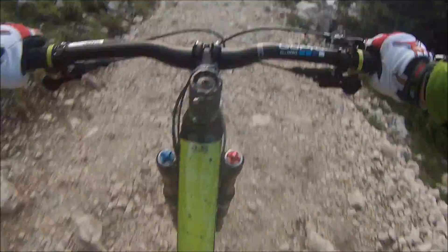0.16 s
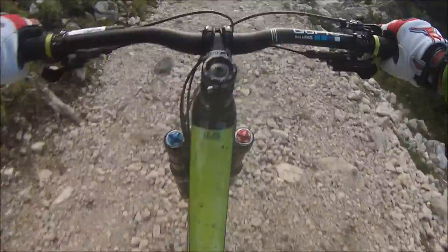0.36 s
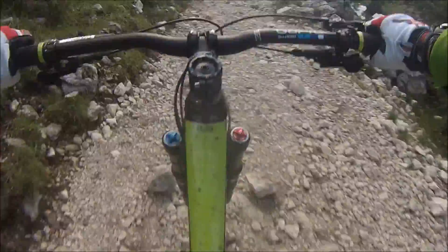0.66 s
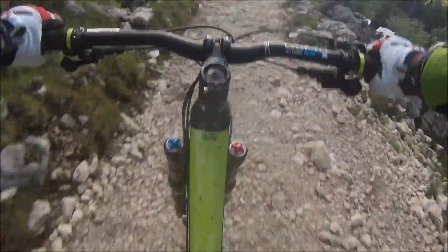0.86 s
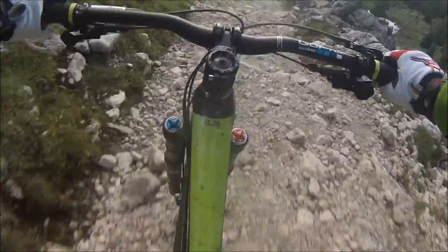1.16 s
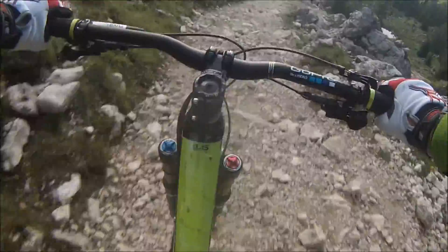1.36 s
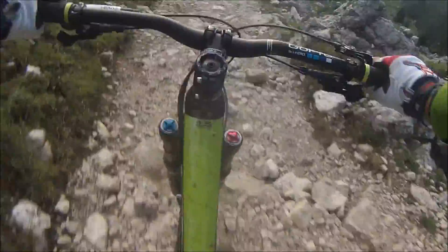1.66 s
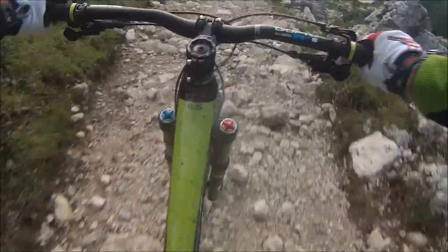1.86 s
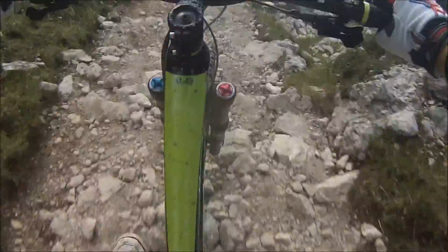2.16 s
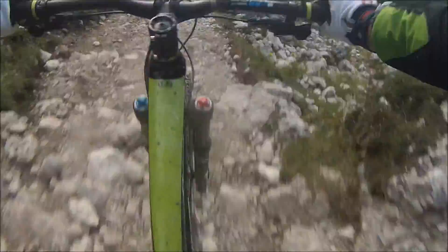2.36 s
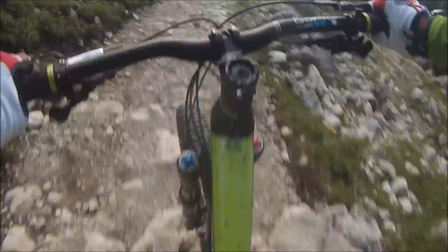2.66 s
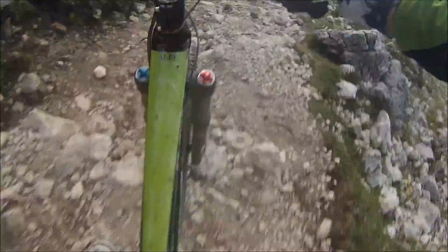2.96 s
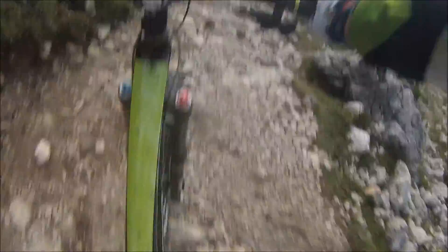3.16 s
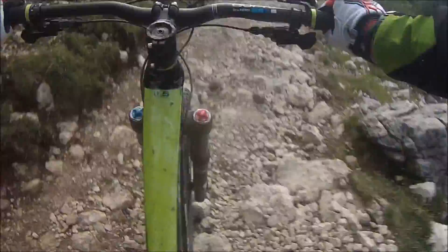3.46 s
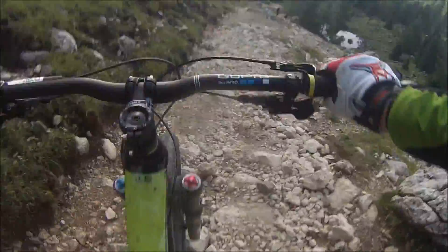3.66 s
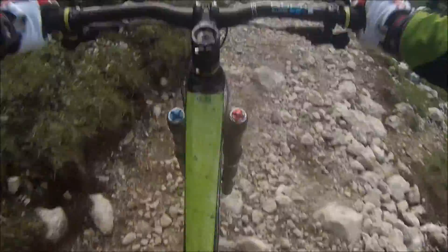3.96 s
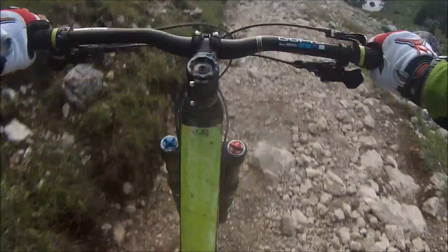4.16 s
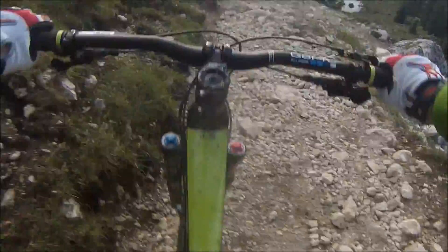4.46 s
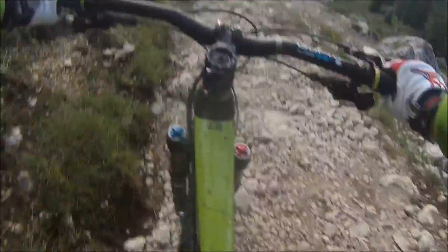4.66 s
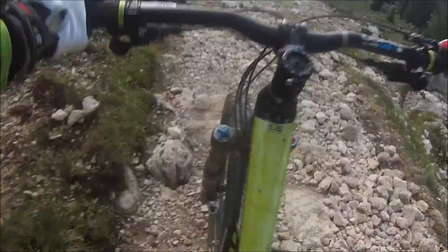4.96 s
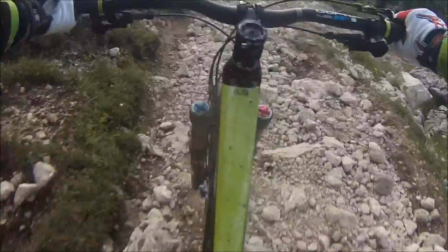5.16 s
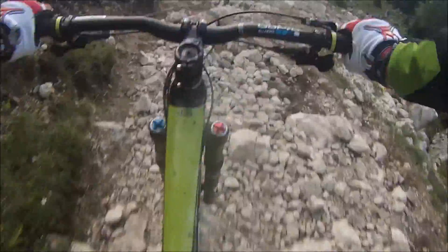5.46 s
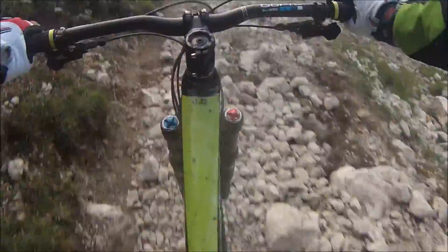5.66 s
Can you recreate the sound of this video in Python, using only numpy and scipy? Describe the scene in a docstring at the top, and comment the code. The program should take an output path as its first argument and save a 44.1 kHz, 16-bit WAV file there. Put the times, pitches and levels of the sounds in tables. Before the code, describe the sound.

A mountain bike rattles and knocks down a loose stony trail, tyres crunching gravel, brakes whistling very high, low wind rumbling on the microphone.

```python
"""On a trail of loose stones a mountain bike rolls downhill, heard from the rider's chest.
Filtered noise makes wind and jolts on the microphone; random stone contacts make the crunch of the tyres.
Short pushes through banks of resonances make the knocking frame and the clacking chain and loose parts,
and faint decaying tones ring on after them. Chirped, fluttering sines make the very high whistle of the
feathered disc brake; short low sine bursts are the tyres thumping into hollows."""
import sys
import numpy as np
from scipy import signal
from scipy.fft import rfft, irfft, next_fast_len
from scipy.io import wavfile
from scipy.ndimage import map_coordinates

SR = 44100
rng = np.random.default_rng(int(sys.argv[2]) if len(sys.argv) > 2 else 0)


def master(y):
    """Save y as 16-bit WAV."""
    cut = np.clip(np.atleast_2d(y).T, -1, 1)
    pcm = np.round(cut * 32767)  # scale
    wavfile.write(sys.argv[1], SR, pcm.astype(np.int16))


N = 255780
TIME = np.arange(N) / SR  # s
BLOW_SIZE = 8192  # samples in one blow
BLOW_HZ = np.arange(BLOW_SIZE // 2 + 1) * SR / BLOW_SIZE

# roughness of the ride; only its swing about the mean is used: (t/s, level/dB)
RIDE_ROUGHNESS = [(0.0, -40), (0.79, -39), (0.93, -43), (1.58, -43), (1.86, -32.5), (2.34, -36),
                  (2.55, -31.5), (2.79, -30), (2.96, -35), (3.16, -34), (3.38, -25.5), (3.84, -38.5),
                  (4.1, -34), (4.51, -41), (4.64, -28.5), (4.85, -40), (5.32, -31.5), (5.8, -38)]
# spectrum of wind on the microphone: (f/Hz, relative level/dB per Hz)
WIND_SPECTRUM = [(15,-5),(28,8),(45,2),(70,-9),(110,-20),(200,-20.5),(400,-43.5)]
# spectrum of the shaking that comes up through the rider: (f/Hz, relative level/dB per Hz)
JOLT_SPECTRUM = [(40,-12),(75,-0.5),(105,6),(170,0),(260,-16.5),(450,-15),(800,-50),(1600,-69)]
WIND_DB, WIND_FOLLOWS = -31.5, 0.82  # wind at mean roughness; dB per dB of roughness
JOLT_DB, JOLT_FOLLOWS = -41, 0.85  # the same for the shaking

# gravel under the rolling tyres: (t/s, level/dB)
ROLLING_LEVEL = [(0.0, -50), (0.79, -49), (0.97, -49.5), (1.55, -50), (1.84, -49), (2.34, -48.5),
                 (2.52, -45), (2.62, -45), (2.92, -53.5), (3.05, -50.5), (3.28, -46.5), (3.93, -48.5),
                 (4.2, -49.5), (4.35, -53.5), (4.51, -43.5), (4.62, -45.5), (4.9, -51), (5.8, -50)]
# spectrum of crunching gravel: (f/Hz, relative level/dB per Hz)
GRAVEL_SPECTRUM = [(200,-8),(450,2.5),(780,0),(1150,2),(1700,4),(2400,6.5),(3200,-24),(4500,-19),(8000,-24.5)]
# spectrum of hissing grit: (f/Hz, relative level/dB per Hz)
GRIT_SPECTRUM = [(1500,-4),(3000,6.5),(4200,1),(6500,-12),(9000,-10.5),(11000,-13.5),(14000,-20),(16000,-30)]
# spectrum of single clicking pebbles: (f/Hz, relative level/dB per Hz)
PEBBLE_SPECTRUM = [(300,-16.5),(1500,6),(3000,-3.5),(7000,-40.5)]
# spectrum of tumbling stones: (f/Hz, relative level/dB per Hz)
STONE_SPECTRUM = [(110,-9),(170,14.5),(280,-1),(450,-2),(750,-38),(1100,-19),(1800,-37)]
# resonances of the rolling wheels: (f/Hz, width/Hz, level/dB)
WHEEL_MODES = [(1530,91,10),(2040,240,0.5),(3420,240,5.5),(4980,150,9.5),(5540,940,0),(6600,480,10)]

# knocks through the frame, a firm one often followed by a soft, hollow rebound:
# (t/s, force level/dB, hollow ring level/dB)
FRAME_KNOCKS = [(0.0277, 25, -10), (0.0632, 24.5, 17.5), (0.3229, 30, 6), (0.3717, 26, 16),
                (0.5235, 22, 11.5), (1.1067, 15, 8), (1.536, 23.5, 5), (1.704, 30.5, 6),
                (1.7556, 31.5, 18.5), (2.0653, 29.5, 5.5), (2.1025, 28, 17), (2.392, 12.5, -5),
                (2.465, 26, 19.5), (2.4779, 13.5, -6), (2.509, 15, -5), (2.6981, 26, 1.5), (2.8301, 17, 17),
                (3.2985, 16.5, 5), (3.7648, 32, 10.5), (4.0935, 13.5, -10.5), (4.1955, 29, -0.5),
                (4.2348, 25.5, 14.5), (4.451, 10, -11), (4.493, 8.5, -10), (4.5197, 27, -1),
                (4.6418, 13, 8.5), (4.6918, 26.5, -0.5), (4.7392, 27.5, 16), (4.8171, 22.5, 18.5),
                (5.003, 14.5, 8), (5.1965, 27.5, -4), (5.385, 24, -10), (5.6235, 27, -5)]
# resonances (+) and antiresonances (-) of the frame: (f/Hz, width/Hz, level/dB)
FRAME_MODES = [(86.7, 21.7, 13.5), (186.6, 19, 3.5), (796, 196, -38), (1180, 376, 17.5), (1348, 276, -8),
               (1773, 175, -37.5), (1877, 145, 7), (2354, 547, 16.5), (2744, 340, -43), (3715, 80, 12.5),
               (4900, 173, 34.5), (5100, 53, 8), (5240, 4260, -32.5), (6230, 120, 9)]
FIRM_SHARP_HZ, FIRM_BASS_DB = 308.4, 0.5  # contact sharpness and bass of a firm knock
# the hollower a knock rings, the duller and lighter it is (both per dB of hollow ring)
SOFTEN_OCTAVES_PER_DB, BASS_LOSS_PER_DB = 0.04, 0.34
# long rings of the metal after a blow, ahead of their overall level: (f/Hz, level/dB, t60/s)
METAL_RINGS = [(1620,-54,0.067),(3745,-49,0.13)]

# chain and loose parts striking: (t/s, force level/dB, contact sharpness f/Hz, ring f/Hz, ring level/dB)
PART_CLACKS = [(0.185, -5, 877, 2460, 32), (0.4363, 5.5, 1450, 2260, 15), (0.6484, 13.5, 1210, 2235, 18),
               (1.3309, 8, 1870, 2280, 9.5), (1.6496, 12.5, 2090, 2230, 5.5), (1.8031, -2, 1090, 1940, 15),
               (1.829, 7.5, 1270, 1530, 16.5), (1.9717, 9.5, 1760, 2080, 12.5), (2.015, 5, 790, 3000, 13),
               (2.194, -7, 700, 2380, 27), (2.293, 12, 484, 2240, 13), (2.3396, 3.5, 2100, 2410, 24),
               (2.426, 9, 714, 1930, 18), (2.447, 16.5, 600, 2410, 20.5), (2.535, 10.5, 690, 2190, 23),
               (2.5884, 0, 1010, 2020, 11), (2.659, -7.5, 2600, 3480, 13.5), (2.693, 6.5, 697, 2040, 16),
               (2.7553, 10.5, 2000, 1910, 3.5), (2.9411, 12, 1040, 2350, 17),
               (3.0236, -5, 2020, 2460, 29.5), (3.183, -8, 1500, 1510, 22), (3.2496, 4, 700, 1800, 22.5),
               (3.316, 4, 1130, 2430, 18), (3.4052, 5.5, 406, 2190, 27.5), (3.5754, -2, 1540, 3590, 19),
               (4.0391, 0, 1980, 2510, 28.5), (4.2666, 3, 600, 2200, 20), (4.3246, 5.5, 920, 2040, 19),
               (4.4264, 3.5, 1090, 2360, 18), (4.803, 9.5, 940, 2320, 10), (4.9693, 7, 2300, 2350, 14),
               (5.0536, 10.5, 2050, 2140, 7), (5.0992, 8.5, 790, 2150, 16.5),
               (5.1474, 2.5, 1060, 2060, 9.5), (5.3305, 1, 2150, 2490, 26.5),
               (5.4573, -2.5, 1260, 2450, 30.5), (5.667, 11, 527, 2360, 26)]
# resonances (+) and antiresonances (-) of the loose parts: (f/Hz, width/Hz, level/dB)
PART_MODES = [(844,300,-11),(1470,1500,3.5),(2081,93,9.5),(3053,114,8.5),(3770,100,9),(4110,53,6),(4916,128,15),(5730,500,-20),(6500,237,13),(7150,150,-13),(8800,130,4.5)]
CLACK_WIDTH_HZ = 243  # width of the main ring

# pulls on the brake lever; the turning disc chirps at an even pace:
# (start t/s, end t/s, number of chirps, level/dB, pitch f/Hz)
BRAKE_PULLS = [(0.209, 0.291, 2, -51.5, 12000), (0.779, 0.955, 2, -47.5, 12120),
               (0.983, 1.611, 6, -44.5, 12400), (1.724, 1.762, 1, -54, 11700), (1.807, 1.99, 1, -46, 12230),
               (1.975, 2.185, 4, -51, 11600), (2.378, 2.407, 1, -46, 11500),
               (2.448, 2.693, 2, -46.5, 12050), (2.801, 2.96, 1, -51, 12350), (2.937, 2.976, 1, -51, 12700),
               (3.098, 3.145, 1, -53, 12300), (3.162, 3.434, 3, -48.5, 12280),
               (3.629, 3.812, 3, -56, 11640), (4.417, 4.51, 1, -45.5, 12140), (4.69, 4.72, 1, -59, 13100),
               (4.81, 5.303, 8, -58, 11750), (5.322, 5.528, 2, -48.5, 12100), (5.542, 5.576, 1, -46, 12600),
               (5.663, 5.893, 2, -51, 12200)]
RUB_SHARE = 0.51  # part of each period in which the pad rubs
CHIRP_BEND_HZ = 170  # mean bend: a chirp usually starts high, sags by about this much and rises again

# a tyre slides and shoves stones aside:
# (start t/s, end t/s, gravel level/dB, coarseness as level of tumbling stones over gravel/dB)
TYRE_SLIDES = [(0.78, 0.823, -54, -22), (2.443, 2.499, -39, 10), (2.803, 2.831, -46, 21),
               (2.93, 2.934, -46, 25), (3.141, 3.339, -54, 20.5), (3.555, 3.634, -51.5, 18.5),
               (4.12, 4.154, -45.5, 9.5), (4.411, 4.589, -45.5, 3.5), (4.78, 4.838, -57, 21),
               (5.457, 5.514, -51, -2), (5.571, 5.595, -50, 7)]
# grit over gravel in a slide; the coarser the stones, the less grit (per dB of coarseness)
GRIT_DB, GRIT_LOSS_PER_DB = -7, 0.72

# tyres bottoming on rocks: (t/s, level/dB at the top of the swell)
TYRE_THUMPS = [(2.431, -12), (2.4453, -10.5), (2.8122, 1.5), (2.9347, -9), (3.227, -9), (3.4016, -3.5),
               (4.566, -9.5), (5.658, -14), (5.676, -8)]


def from_db(db):
    """Decibels to gain."""
    return 10 ** (np.asarray(db) / 20)


def rms_one(x):
    """Scale to unit power."""
    return x / np.sqrt(np.mean(x ** 2) + 1e-20)


def add(out, s, sound):
    """Mix a sound in at time s."""
    at = max(round(s * SR), 0)
    out[at:at + len(sound)] += sound[:max(N - at, 0)]


def drift(rate):
    """Smooth random wander through `rate` random points a second, rms 1."""
    knots = rng.standard_normal(8192)
    return rms_one(map_coordinates(knots, [TIME * rate], order=3, mode="wrap"))


def resonances(hz, table):
    """Causal response of a chain of peaks and dips."""
    s = 1j * hz
    response = 1
    for f, width, db in table:
        peak = s * s + s * width * from_db(db) + f * f
        response = response * peak / (s * s + s * width + f * f)
    return response


def coloured(x, spectrum, body=None):
    """Give x a smooth spectrum and, if there is one, the resonances of a body; rms 1."""
    size = next_fast_len(N)
    hz = np.arange(size // 2 + 1) * SR / size + 1e-3
    points_hz, points_db = np.transpose(spectrum)
    gain = from_db(np.interp(np.log(hz), np.log(points_hz), points_db))
    # roll off beyond both ends of the table
    gain = gain / (1 + (hz / points_hz[-1]) ** 2)
    gain = gain / (1 + (.5 * points_hz[0] / hz) ** 2)
    if body:
        gain = gain * resonances(hz, body)
    return rms_one(irfft(rfft(x, size) * gain, size)[:N])


def grains(per_s, spread_db, hiss):
    """Random stone contacts of very uneven size on a bed of fine hiss."""
    sizes = from_db(spread_db * np.minimum(rng.exponential(1, N), 4))
    signed = sizes * rng.choice([-1, 1], N)
    struck = rng.random(N) < per_s / SR
    return rms_one(signed * struck) + hiss * rng.standard_normal(N)


def rumble(rough_db):
    """Lumpy wind on the microphone and shaking through the rider; both grow with the roughness of the ride."""
    wind = coloured(rng.standard_normal(N) * from_db(4.4 * drift(24)), WIND_SPECTRUM)
    jolts = coloured(grains(per_s=150, spread_db=3.5, hiss=0.52), JOLT_SPECTRUM)
    wind_gain = from_db(WIND_DB + WIND_FOLLOWS * rough_db)
    jolt_gain = from_db(JOLT_DB + JOLT_FOLLOWS * rough_db)
    return wind_gain * wind + jolt_gain * jolts


def tyres(rolling_db):
    """Stones grind under the tread in clumps; slides add tumbling stones, clicking pebbles and hissing grit."""
    shoved, ground_up, sprayed = sliding()
    clumps = from_db(3.1 * drift(55))
    stones = coloured(grains(per_s=310, spread_db=3.0, hiss=0.25), STONE_SPECTRUM)
    gravel = coloured(clumps * grains(per_s=1200, spread_db=3.5, hiss=0.98), GRAVEL_SPECTRUM, WHEEL_MODES)
    pebbles = coloured(grains(per_s=170, spread_db=4.5, hiss=.1), PEBBLE_SPECTRUM, WHEEL_MODES)
    grit = coloured(clumps * grains(per_s=2400, spread_db=5.0, hiss=0.85), GRIT_SPECTRUM, WHEEL_MODES)
    crunch = from_db(-2.5) * gravel + from_db(-9.0) * pebbles + from_db(-9.5) * grit
    roll = from_db(rolling_db) * crunch
    tumble = shoved * (stones + from_db(-4.5) * pebbles)
    return roll + tumble + ground_up * gravel + from_db(-3.0) * sprayed * grit


def contact(sharp_hz):
    """Spectrum of a short push: the softer the contact, the less treble."""
    s = 1j * BLOW_HZ / sharp_hz
    return 1 / (s * s + np.sqrt(2) * s + 1)


def dispersion(centre_hz, width_hz):
    """Bending waves of different pitch arrive at different times, which spreads a blow."""
    s = 1j * BLOW_HZ
    return (s * s - s * width_hz + centre_hz ** 2) / (s * s + s * width_hz + centre_hz ** 2)


def chatter(level_db, fade_s, low_hz):
    """The surfaces never meet cleanly: a swarm of tiny rebounds, thinned below low_hz, follows each blow."""
    t, s = TIME[:BLOW_SIZE], 1j * BLOW_HZ
    rebounds = rng.standard_normal(BLOW_SIZE) * (t / fade_s) * np.exp(-t / fade_s)
    swarm = rfft(rebounds / np.sqrt(np.sum(rebounds ** 2)))
    return 1 + from_db(level_db) * swarm * s / (s + low_hz)


def shaken_part(level_db=5, lag_s=0.007, ring_hz=2110, width_hz=95):
    """A loose part lifts with a knock and lands a moment later, ringing."""
    s = 1j * BLOW_HZ
    lag = lag_s * np.exp(0.18 * rng.standard_normal())
    ring = s * width_hz / (s * s + s * width_hz + ring_hz ** 2)
    return from_db(level_db) * ring * np.exp(-2 * np.pi * s * lag)


def knocks(bass_hz=150, low_cut_hz=40, hollow_hz=475, hollow_width_hz=50):
    """Each rock drives the frame; the softer rebounds also ring a hollow note."""
    out, s = np.zeros(N), 1j * BLOW_HZ
    frame = resonances(BLOW_HZ, FRAME_MODES) * s / (s + low_cut_hz)
    frame = frame * dispersion(centre_hz=1520, width_hz=5900) * contact(sharp_hz=7950)
    frame = frame * resonances(BLOW_HZ, [(4520, 1440, -16.0)])  # broad dip in the treble
    for at, force_db, hollow_db in FRAME_KNOCKS:
        softness = max(hollow_db, 0)
        sharp_hz = FIRM_SHARP_HZ * 2 ** (-SOFTEN_OCTAVES_PER_DB * softness)
        bass_gain = from_db(FIRM_BASS_DB - BASS_LOSS_PER_DB * softness)
        bass = (s + bass_hz * bass_gain) / (s + bass_hz)
        note_hz = hollow_hz * (1 + 0.011 * rng.standard_normal())
        hollow = resonances(BLOW_HZ, [(note_hz, hollow_width_hz, hollow_db)])
        push = contact(sharp_hz) * chatter(level_db=-6.5, fade_s=0.0018, low_hz=880)
        response = frame * bass * hollow + shaken_part(level_db=15)
        add(out, at, from_db(force_db) * irfft(response * push))
    return out


def metal_ring(blows):
    """The metal goes on ringing faintly after every blow, unevenly as the bike shakes."""
    t = TIME[:BLOW_SIZE]
    ring = sum(from_db(db - 60 * t / t60) * np.sin(2 * np.pi * hz * t) for hz, db, t60 in METAL_RINGS)
    return from_db(-8.5 + 2.4 * drift(60)) * signal.fftconvolve(blows, ring)[:N]


def rattles(rough_db, count=40, force_db=-11, spread_db=3, sharp_hz=850, ring_hz=1950, ring_db=14):
    """Faint clacks at random moments, stronger where the ride is rough; rows like those of PART_CLACKS."""
    moments = (rng.random(count) * N).astype(int)
    rows = []
    for i, (size, spot) in zip(moments, rng.standard_normal((count, 2))):
        level_db = force_db + rough_db[i] + spread_db * size
        rows.append((i / SR, level_db, sharp_hz, ring_hz * np.exp(0.41 * spot), ring_db))
    return rows


def clacks(rough_db):
    """Hard little blows; each struck spot has its own main ring and weights the upper resonances anew."""
    out = np.zeros(N)
    spread = dispersion(centre_hz=2070, width_hz=430) * contact(sharp_hz=8240)
    for at, force_db, sharp_hz, ring_hz, ring_db in PART_CLACKS + rattles(rough_db):
        weights = 1 + 0.12 * rng.standard_normal(len(PART_MODES))
        modes = [(ring_hz, CLACK_WIDTH_HZ, ring_db)]
        for (hz, width, db), weight in zip(PART_MODES, weights):
            is_upper = hz > ring_hz + CLACK_WIDTH_HZ
            modes.append((hz, width, db * weight if is_upper else db))
        spot = resonances(BLOW_HZ, modes)
        push = contact(sharp_hz) * chatter(level_db=1.5, fade_s=0.00097, low_hz=4800)
        add(out, at, from_db(force_db) * irfft(spread * spot * push))
    return out


def brake(attack_s=0.0021, ring_s=0.01, wander_hz=100, glide_hz=90, rough_db=5.0):
    """The pads excite one high disc mode in even chirps; it bends and flutters with the grip, then rings out."""
    out = np.zeros(N)
    flutter = rms_one(from_db(rough_db * drift(350)))
    wander = wander_hz * drift(500) + glide_hz * drift(28)
    for first, end, count, level_db, pitch_hz in BRAKE_PULLS:
        starts, period_s = np.linspace(first, end, round(count), endpoint=False, retstep=True)
        rub_s = RUB_SHARE * period_s
        for start, grip in zip(starts, rng.standard_normal(len(starts))):
            span = slice(int(start * SR), int((start + rub_s + .08) * SR))
            t = np.maximum(TIME[span] - start, 0)
            bend = (2 * np.minimum(t / rub_s, 1) - 1) ** 2  # high, low, high over one rub
            hz = pitch_hz + wander[span] + CHIRP_BEND_HZ * (1 + 0.6 * grip) * bend
            swell = (1 - np.exp(-t / attack_s)) ** 2 * np.exp(-np.maximum(t - rub_s, 0) / ring_s)
            whistle = np.sin(2 * np.pi * np.cumsum(hz) / SR)
            add(out, start, from_db(level_db) * swell * flutter[span] * whistle)
    return out


def sliding(bite_s=0.0039, settle_s=0.012):
    """Strength of tumbling stones, gravel and grit: each slide bites quickly and then settles."""
    out = np.zeros((3, N))
    for start, end, gravel_db, coarse_db in TYRE_SLIDES:
        bite = np.clip((TIME - start) / bite_s, 0, 1)
        settle = np.exp(-np.clip(TIME - end, 0, 1) / settle_s)
        grit_db = gravel_db + GRIT_DB - GRIT_LOSS_PER_DB * coarse_db
        levels_db = [gravel_db + coarse_db, gravel_db, grit_db]
        out += from_db(levels_db)[:, None] * bite * settle
    return out


def thumps(bounce_hz=88, rise_s=0.0037):
    """A soft heavy push that swells and dies within two swings."""
    out, t = np.zeros(N), TIME[:BLOW_SIZE]
    swell = t / rise_s * np.exp(1 - t / rise_s)
    swing = swell * np.sin(2 * np.pi * bounce_hz * t)
    for at, level_db in TYRE_THUMPS:
        add(out, at, from_db(level_db) * swing)
    return out


def scene():
    """Bike, trail and wind on one microphone."""
    ride_db = np.interp(TIME, *np.transpose(RIDE_ROUGHNESS))
    rolling_db = np.interp(TIME, *np.transpose(ROLLING_LEVEL))
    rough_db = ride_db - ride_db.mean()
    ground = rumble(rough_db) + tyres(rolling_db)
    blows = knocks() + clacks(rough_db)
    return (ground + blows + metal_ring(blows) + brake() + thumps())[None]


def record(dry):
    """The highest peaks are rounded off and the top is cut."""
    rounded = dry / (1 + dry ** 6) ** (1 / 6)
    top_cut = signal.cheby2(12, 70, 16000, fs=SR, output="sos")  # 70 dB down from 16 kHz up
    return signal.sosfilt(top_cut, rounded)


dry = scene()
out = record(dry)
master(out)
```